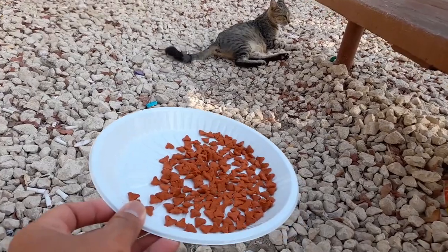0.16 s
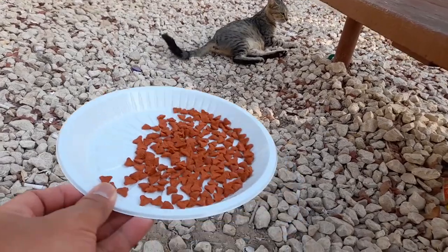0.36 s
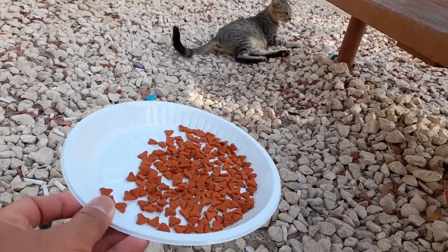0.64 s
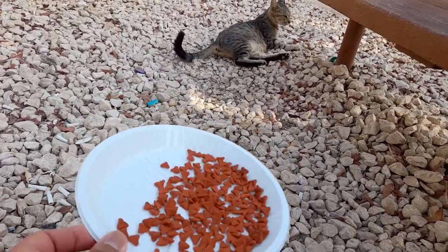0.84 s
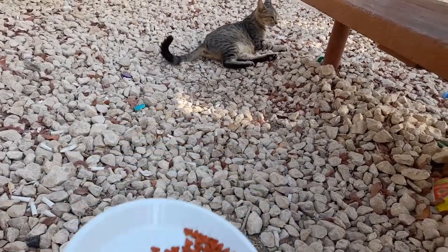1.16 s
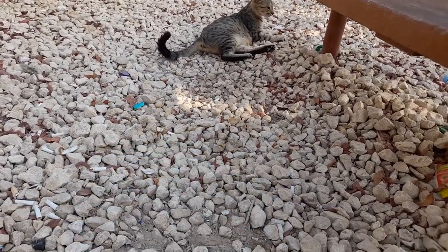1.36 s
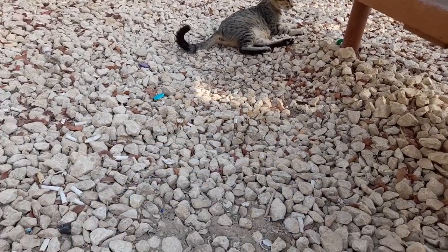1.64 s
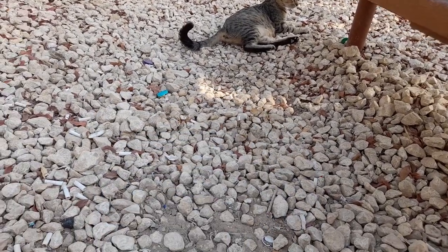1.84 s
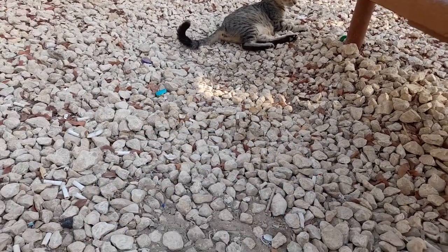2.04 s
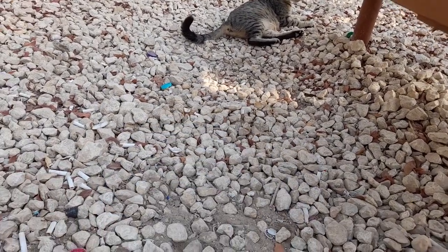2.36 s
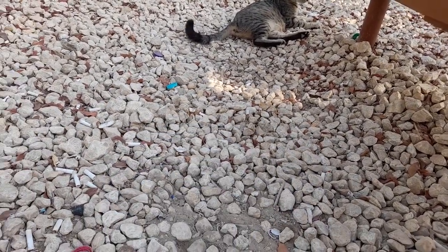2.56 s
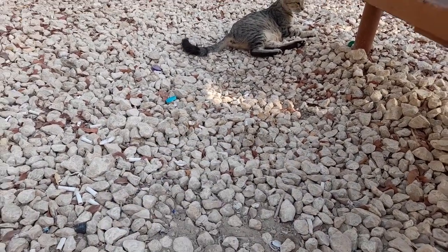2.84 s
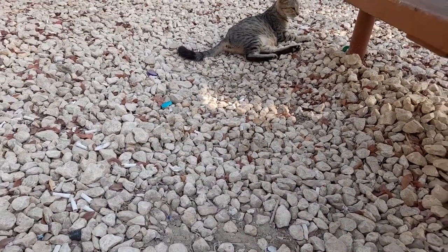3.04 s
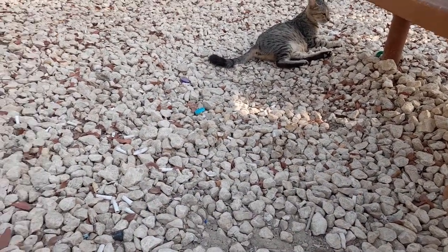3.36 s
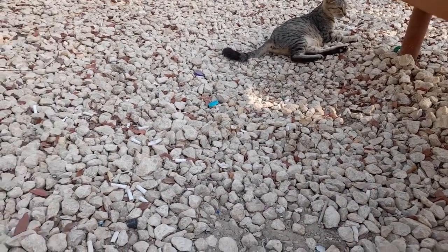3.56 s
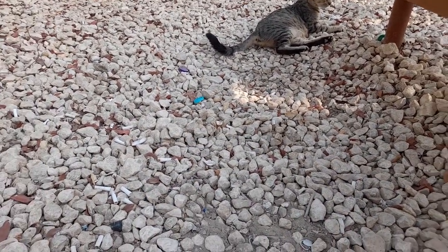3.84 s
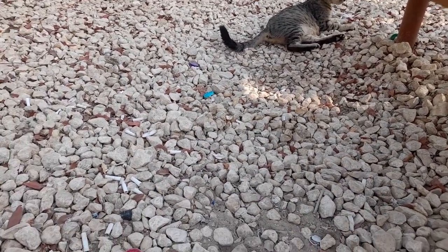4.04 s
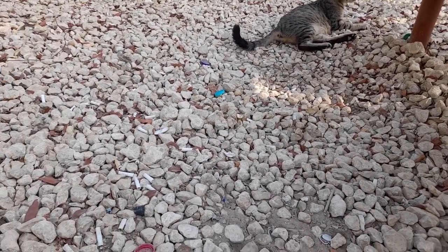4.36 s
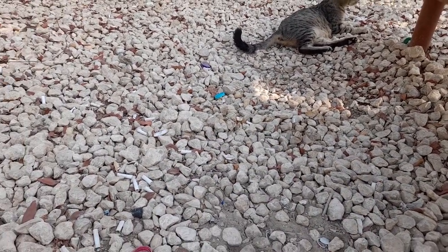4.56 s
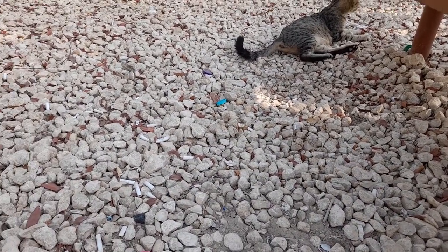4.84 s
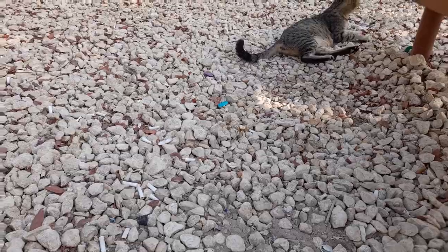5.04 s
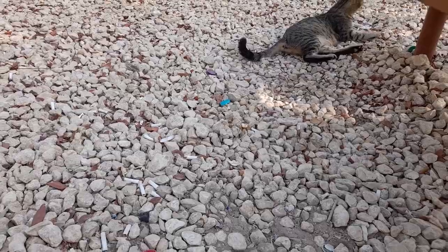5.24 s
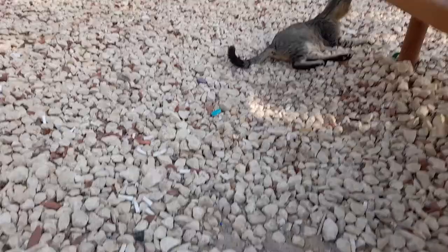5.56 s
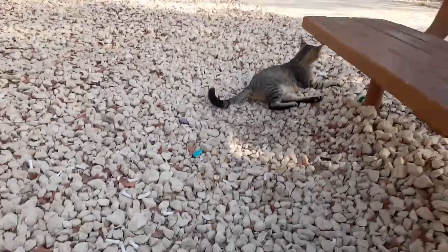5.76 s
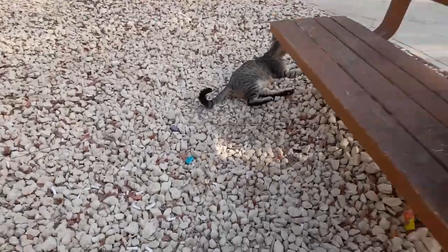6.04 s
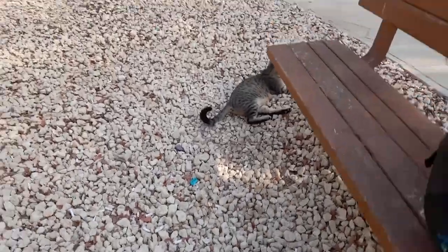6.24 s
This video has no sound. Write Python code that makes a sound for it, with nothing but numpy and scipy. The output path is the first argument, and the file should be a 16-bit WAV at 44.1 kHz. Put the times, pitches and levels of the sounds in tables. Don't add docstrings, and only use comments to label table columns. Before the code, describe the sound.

Three short, hard crunches of shoes shifting on coarse gravel, then quiet distant traffic rumble, and finally faint cloth rustles and sharp stone clicks.

```python
import sys
import numpy as np
from scipy import signal
from scipy.io import wavfile

SR = 44100
rng = np.random.default_rng(int(sys.argv[2]) if len(sys.argv) > 2 else 0)


def wav_out(sig):
    wavfile.write(sys.argv[1], SR, np.round(np.clip(np.atleast_2d(sig).T, -1, 1) * 32767).astype(np.int16))


def volts(x):
    e = np.asarray(x, float) / 20
    return 10 ** e


N = 282681


def rms_one(x):
    return x / np.sqrt(np.mean(x ** 2) + 1e-20)


def in_time(rows, silent_db=None):
    s, *columns = np.transpose(rows)
    return [np.interp(np.arange(N) / SR, s, c, silent_db, silent_db) for c in columns]


def at_hz(points, hz):
    points_hz, values = np.transpose(points)
    return np.interp(np.log(hz), np.log(points_hz), values)


def band(order, edges_hz, x, kind="band"):
    return signal.sosfilt(signal.butter(order, edges_hz, kind, fs=SR, output="sos"), x)


def drift(rate_hz):
    r = np.exp(-80 * np.pi * rate_hz / SR)
    slow = signal.lfilter([1], [1, -2 * r, r * r], rng.standard_normal(N // 40 + 2002))[2000:]
    return np.interp(np.arange(N) / 40, np.arange(len(slow)), rms_one(slow))


def ring(clicks, hz, t60_s):
    r = volts(-60 / (t60_s * SR))
    w = 2 * np.pi * min(hz, .45 * SR) / SR
    return signal.lfilter([np.sin(w)], [1, -2 * r * np.cos(w), r * r], clicks + 1e-18)


def noise(spectrum, low_hz, high_hz, alike, lead, patchy_db):
    edges = np.geomspace(low_hz, high_hz, round(3 * np.log2(high_hz / low_hz)) + 1)
    white, out = rng.standard_normal((2, 3, N + 4000)), 0
    for k, (low, high) in enumerate(zip(edges, edges[1:])):
        both, left, right = band(2, [low, high], white[k % 2])[:, -N:]
        hz = np.sqrt(low * high)
        share = np.clip(at_hz(alike, hz), 0, 1)
        pair = np.sqrt(share) * np.array([both, np.roll(both, lead)])
        pair += np.sqrt(1 - share) * np.array([left, right])
        out = out + volts(at_hz(spectrum, hz) + patchy_db * drift(min(hz / 30, 15))) * pair
    return rms_one(out)


def rubbed(rows, ring_s, lead):
    out = np.zeros((2, N + SR))
    for s, ms, hz, level_db in rows:
        span, at = round(ms * SR / 1000), round(s * SR)
        rub = rng.standard_normal(span) * np.hanning(span) ** .5
        note = ring(np.pad(rub, (0, SR // 20)), hz, ring_s)
        note *= volts(level_db) / np.sqrt(np.sum(note ** 2) / span)
        for side, delay in enumerate((0, lead)):
            out[side, at + delay:at + delay + len(note)] += note
    return out[:, :N]


# time_s, firing_hz, level_db, octave_db
ENGINES = [
    [(0.1, 87.1, -66, -62.5), (.35, 88.1, -80, -42.5), (.65, 90, -37, -42.5), (.9, 91.34, -40, -54),
     (1.25, 88.8, -44, -51), (1.6, 84.6, -77, -59)],
    [(1.62, 85.8, -61, -71), (1.75, 78.2, -42, -83), (1.95, 70.3, -51, -43.5), (2.15, 71.8, -43.5, -47),
     (2.35, 76.35, -40.5, -62), (2.55, 68, -40, -43), (2.75, 68, -70, -76)],
    [(4.4, 89.3, -64, -75), (4.7, 89.5, -43.5, -62), (4.95, 89.9, -36, -62), (5.15, 89.9, -62, -54),
     (5.35, 90.7, -34.5, -67), (5.6, 92, -61, -75)],
    [(6.2, 134.5, -77, -72), (6.35, 136, -33, -50), (6.41, 133, -38, -63)],
]


def engine(rows):
    hz, = in_time(rows)[:1]
    level_db, octave_db = in_time(rows, silent_db=-120)[1:]
    turn = 2 * np.pi * np.cumsum(hz) / SR
    return np.sqrt(2) * (volts(level_db) * np.sin(turn) + volts(octave_db) * np.sin(2 * turn))


# time_s, level_db
FLOW = [(0.0, -36), (0.21, -43.5), (0.77, -38.5), (1.48, -40.5), (2.03, -36), (2.27, -40.5), (2.46, -35),
        (2.95, -42), (3.3, -37.5), (3.59, -44), (3.62, -38.5), (4.71, -39), (4.91, -36), (5.71, -42),
        (5.91, -32.5), (6.09, -42.5), (6.39, -33.5), (6.41, -38)]
# pitch_hz, level_db_per_hz
ROAD = [(15, -49), (25, -60), (54, -11), (102, -9.5), (140, -1), (162, -12), (279, -6.5), (480, -29),
        (786, -29), (981, -38), (1140, -34.5), (2050, -36.5), (3120, -45), (3620, -42.5), (9000, -68.5),
        (11700, -95), (19800, -120)]
# pitch_hz, power_share
FAR_ALIKE = [(30, 1), (70, 0.88), (130, 0.96), (300, 0.75), (700, 0.199), (2000, 0.65), (8000, 0.072)]
# mean_db, swing_share
LAYERS = [
    (-40, 0.99),
    (-42.5, 0.9),
    (-48, 0.4),
    (-61.5, 0.25),
]
# time_s, lift_db, half_width_s
NEAR_CARS = [
    (.77, 6, .1),
    (5.95, 7, 0.25),
    (6.37, 6.5, 0.12),
]


def traffic():
    flow_db, = in_time(FLOW)
    swing_db = flow_db - flow_db.mean()
    deep_db, rumble_db, drone_db, tyre_db = [db + share * swing_db for db, share in LAYERS]
    for s, lift_db, half_s in NEAR_CARS:
        near_db = lift_db * np.exp(-((np.arange(N) / SR - s) / half_s) ** 2)
        tyre_db = tyre_db + near_db
        drone_db = drone_db + 0.12 * near_db
    out = volts(deep_db) * noise(ROAD, 36, 110, FAR_ALIKE, 3, patchy_db=1.5)
    out += volts(rumble_db) * noise(ROAD, 110, 200, FAR_ALIKE, 3, patchy_db=1.5)
    out += volts(drone_db) * noise(ROAD, 200, 450, FAR_ALIKE, 6, patchy_db=1.2)
    out += volts(tyre_db) * noise(ROAD, 450, 1050, FAR_ALIKE, 5, patchy_db=1.0)
    out += volts(-57) * noise(ROAD, 1080, 9300, FAR_ALIKE, 21, patchy_db=-1.8)
    return out + sum(engine(rows) for rows in ENGINES)


# start_s, length_ms, pitch_hz, level_db
TREAD = [(5.65, 120, 730, -60), (5.79, 92, 855, -63), (5.82, 120, 570, -67), (5.87, 60, 750, -59),
         (5.905, 52, 820, -56), (6.04, 47, 675, -58), (6.28, 100, 700, -64)]


def tyre_tread():
    return rubbed(TREAD, ring_s=0.084, lead=2)


# time_s, level_db
SETTLING = [
    [(2.655, -90), (2.68, -75), (2.85, -72), (3.0, -84), (3.1, -95)],
    [(5.66, -90), (5.72, -67), (6.0, -67), (6.14, -70), (6.2, -60), (6.26, -72), (6.41, -70)],
]


def settling():
    hiss = rms_one(band(2, [10000, 16000], rng.standard_normal(N)))
    level = sum(volts(in_time(rows, silent_db=-120)[0]) for rows in SETTLING)
    return hiss * volts(1.5 * drift(20)) * level


# start_s, hold_s, level_db, sheen_db
SWISHES = [(3.197, 0.25, -55, -8), (4.693, .006, -55.5, -13), (5.05, 0.011, -56.5, -25),
           (5.11, 0.047, -64, -27), (5.43, 0.056, -60, 1), (5.58, 0.16, -59, -17),
           (5.817, 0.028, -54.5, -16), (6.148, 0.054, -55, -12), (6.32, 0.037, -59, -29)]
# time_s, effort_db
LEANING = [(5.25, -90), (5.36, -63), (5.55, -52), (5.76, -58), (5.95, -58), (6.13, -60.5), (6.41, -56)]


def swishes():
    rise_db_per_s, fall_db_per_s = 600, 700
    linger_db, linger_db_per_s = -7, 24.5
    t, presence, sheen = np.arange(0, N, 16) / SR, 0, 0
    for s, hold, level_db, sheen_db in SWISHES:
        after = np.maximum(t - s - hold, 0)
        before_db = level_db - rise_db_per_s * np.maximum(s - t, 0)
        stroke = volts(before_db - fall_db_per_s * after)
        linger = volts(before_db + linger_db - linger_db_per_s * after)
        presence = presence + np.maximum(stroke, linger)
        sheen = sheen + stroke * volts(sheen_db)
    presence, sheen = np.repeat([presence, sheen], 16, axis=1)[:, :N]
    strain = volts(in_time(LEANING, silent_db=-120)[0])
    return presence + strain, sheen + strain * volts(-8)


# pitch_hz, level_db_per_hz
CLOTH = [(500, -10), (1000, -3), (2000, 3.5), (3400, -2.5), (5200, -3), (7000, -21), (8500, -18)]
# pitch_hz, level_db_per_hz
SHEEN = [(7500, -1), (10000, -1.5), (13000, 3.5), (16000, 1)]
# pitch_hz, power_share
NEAR_ALIKE = [(500, 0.9), (1500, 0.39), (4000, 0.074), (12000, 0.088)]


def clothes():
    presence, sheen = swishes()
    dull = noise(CLOTH, 450, 7500, NEAR_ALIKE, lead=13, patchy_db=1.4)
    bright = noise(SHEEN, 6700, 18000, NEAR_ALIKE, lead=5, patchy_db=1.0)
    return presence * volts(0.93 * drift(43)) * dull + sheen * bright


# start_s, length_ms, mode_hz, level_db
CREAKS = [(4.684, 24, 5170, -62), (4.686, 9.1, 7090, -67), (4.686, 8, 8700, -69), (5.439, 4, 12900, -58),
          (5.039, 20, 5070, -58.5), (5.044, 16.4, 3680, -63), (5.467, 4, 12700, -60),
          (5.042, 20, 6700, -76), (5.042, 24, 8750, -74), (5.12, 14, 2300, -62), (5.124, 20, 5250, -63),
          (5.126, 10, 4060, -61), (5.806, 12, 2600, -49), (5.807, 13, 3560, -53), (5.808, 11, 4700, -49),
          (5.804, 13, 6340, -55), (5.812, 9, 7900, -64), (5.812, 9, 8960, -68), (5.822, 13, 2470, -52),
          (5.823, 12, 4600, -57), (5.83, 12, 3600, -58)]


def plate():
    return rubbed(CREAKS, ring_s=0.028, lead=12)


def ground(x, echo_db):
    t = np.arange(round(.012 * SR)) / SR
    scatter = rng.standard_normal((2, len(t))) * (t > .0016) * volts(-60 * t / 0.0056)
    scatter = band(2, [1400, 7000], scatter)
    scatter *= volts(echo_db) / np.sqrt(np.sum(scatter ** 2, axis=1, keepdims=True))
    return x + signal.oaconvolve(x, scatter, axes=1)[:, :N]


# time_s, left_minus_right_db of the middle stones
FEET_PAN = [(.9, 0.5), (1.8, -1), (2.65, -5), (3.1, -7)]


def feet_pan_db():
    return in_time(FEET_PAN)[0]


# time_s, peak_db, ring_hz
CRACKLE = [(0.2627, -22, 2300), (.2735, -33, 2150), (.344, -29, 1200), (.357, -26, 1250),
           (.362, -27, 1940), (.381, -39, 5000), (.398, -39, 4900), (.417, -28, 1160),
           (.614, -35, 1200), (.374, -31, 1980), (0.382, -25, 1790), (0.4138, -24, 1990),
           (.5388, -36, 1420), (0.544, -30, 2170), (0.604, -33, 1720), (.6112, -25, 2200),
           (.6165, -35, 2020), (.6323, -32, 1490), (.755, -26, 2130), (.763, -26, 1490),
           (.77, -28, 1210), (0.7808, -18, 2150), (0.861, -12, 5300), (.956, -26, 5200),
           (.968, -20, 5000), (.993, -29, 1200), (.999, -23, 1900), (1.005, -27, 1700),
           (1.017, -34, 2000), (.799, -20, 1650), (0.806, -16, 2390), (0.821, -17, 1650),
           (.845, -11.5, 2450), (.869, -6, 2500), (0.8759, -10, 1660), (.8852, -15, 1560),
           (0.8905, -12.5, 1670), (.903, -7, 1700), (0.8968, -16, 1700), (0.912, -15, 1680),
           (.925, -18, 1700), (0.94, -15, 2560), (0.956, -20.5, 1720), (0.966, -20, 2550),
           (1.0336, -26, 1770), (1.05, -28, 1510),
           (1.634, -35, 2200), (1.6423, -32, 1600), (1.6735, -16.5, 1150), (1.6758, -23, 1520),
                  (1.6945, -25, 1270), (1.7087, -20, 1660), (1.713, -21, 1850), (1.739, -10, 1660),
                  (1.7466, -11, 1160), (1.7517, -13, 1200), (1.7683, -27, 1700), (1.7758, -14, 1270),
                  (1.79, -18, 1200), (1.802, -22, 1740), (1.875, -39, 1200), (1.888, -37, 1250),
                  (2.006, -29, 1200), (2.09, -16, 1200), (2.18, -38, 1200), (1.8134, -17, 1610),
                  (1.832, -18, 1700), (1.8435, -26, 1870), (1.855, -28, 1510), (1.95, -25.5, 1460),
                  (2.008, -22, 2200), (2.0205, -20.5, 1110), (2.038, -26, 2430), (2.0555, -16, 4480),
                  (2.0707, -17, 1700), (2.0856, -9, 2253), (2.0965, -9, 1838), (2.11, -24, 1700),
                  (2.1614, -20, 2270), (2.1658, -25, 2390), (2.2204, -31, 1581), (2.2515, -28, 1460),
           (2.294, -37, 2320), (2.3, -27, 1900), (2.306, -40, 5000), (2.402, -31, 1200),
                 (2.3064, -19.5, 1650), (2.3132, -26, 1610), (2.3245, -29, 1580), (2.3787, -25, 1690),
                 (2.4017, -30, 1683), (2.4766, -32, 1700), (2.554, -33, 1640), (2.5643, -36, 2130),
                 (2.578, -23, 1140), (2.607, -4, 1800), (2.6277, -5, 2650), (2.633, -10, 1660),
                 (2.638, -9, 2300), (2.66, -24, 1665), (2.706, -40, 2400), (2.7507, -32, 1312),
                 (2.7512, -41, 5200), (2.756, -30.5, 1960)]
# time_s, peak_db, ring_hz
THUMPS = [(0.93, -22, 480), (.861, -14, 520), (2.5, -33, 690), (1.7, -30, 690), (2.1, -34, 690),
          (6.14, -38, 640), (6.0315, -31, 990), (6.13, -43, 520), (6.2547, -31, 464), (6.2545, -35, 590)]


def crackle():
    for s, peak_db, hz in CRACKLE + THUMPS:
        ring_ms = 10.6 * (1700 / hz) ** 0.7
        yield s, peak_db + 6, hz, -29.5, 3, ring_ms


# time_s, peak_db, ring_hz, ring_ms, grit_db
KNOCKS = [(0.2614, -15, 1280, 10, -19), (0.3463, -17, 1400, 10, -31), (0.518, -27.5, 1500, 5.5, -14),
          (.666, -23.5, 2150, 8.8, -25), (0.871, -15, 1717, 5.6, -28), (0.884, 0, 1600, 12, -30),
          (0.908, -3, 1680, 9.6, -34), (1.671, -5.5, 1630, 8.5, -32), (1.745, -0.6, 1650, 5.1, -26),
          (1.777, -1.5, 2300, 3.3, -26), (1.793, -8.5, 1160, 10, -30), (1.882, -26, 4800, 2.8, -7),
          (2.0654, 2, 1250, 4.5, -19), (2.16, -14.5, 1280, 16, -25), (2.2522, -25, 1994, 6.7, -28),
          (2.379, -16, 3380, 4.4, -12), (2.47, -23.5, 1643, 54, -32), (2.493, -22, 1660, 37.5, -32),
          (2.5968, 5, 2920, 7.1, -39), (2.6075, -15, 1665, 6.5, -30), (2.64, 1.5, 1870, 9, -41)]
# time_s, peak_db, ring_hz, ring_ms, grit_db
SNAPS = [(5.5426, -29, 3830, 2.4, -9), (5.559, -26, 4440, 2.8, -30), (5.5665, -26, 4570, 2.5, -9),
         (5.576, -9, 4530, 0.73, -19), (5.5844, -29, 5080, 2.5, -6), (5.594, -20, 4800, 2.1, -12),
         (5.6213, -2, 4680, 2.2, -14.5), (5.6505, -4.5, 4760, 2.6, -16.5), (5.7322, -13, 4330, 1.4, -34),
         (5.808, -33, 5840, 3, -25), (5.8125, -32, 4700, 3, -28), (5.819, -32, 3000, 2.4, -24),
         (5.829, -38, 4400, 3.2, -25), (6.146, -30, 5600, 3, -17), (6.167, -29, 5100, 4.5, -12),
         (6.184, -36, 4000, 2.1, -4), (6.196, -30, 5000, 3, -3), (6.219, -28, 5000, 5.4, -16)]
# time_s, peak_db, ring_hz, ring_ms, grit_db
CLACKS = [(1.2078, -16, 2110, 4.4, -34), (1.2072, -40, 1300, 7, -33), (2.7515, -20.5, 1850, 8.6, -36),
          (3.0086, -30.5, 3340, 5, -35), (6.0314, -6, 2720, 2.5, -51), (6.0314, 0, 4800, 1.6, -45),
          (6.0314, -9, 3550, 2.9, -45), (6.1297, -22.5, 2040, 17, -40), (6.1302, -12.5, 880, 3.7, -48),
          (6.2545, -22, 5200, .6, -21)]
# left_lead_samples at 2 kHz, lead_samples_per_octave
CONTACTS = [
    (3, 0.01),
    (12, 0.01),
    (6, 2.9),
]


def contacts():
    for table, (lead, per_octave) in zip((KNOCKS, SNAPS, CLACKS), CONTACTS):
        for s, peak_db, hz, ring_ms, grit_db in table:
            yield s, peak_db, hz, grit_db, lead + per_octave * np.log2(hz / 2000), ring_ms


def knocks(table):
    out, span = np.zeros((2, N)), round(.04 * SR)
    pan_db = feet_pan_db()
    click = 1. * (np.arange(span) == 0)
    for s, peak_db, hz, grit_db, lead, ring_ms in table:
        near = rng.uniform([.55, 1.2], [.75, 1.5])
        body = ring(click, hz, ring_ms / 1000)
        body += volts(-42) * sum(ring(click, hz * k, ring_ms / 1400) for k in near)
        if hz < 2600:
            body += volts(-18) * ring(click, 5540, .003)
        body = band(4, [750, 6600], body) if hz > 700 else band(2, [380, 3000], body)
        grit = rng.standard_normal(span) * volts(-60 * np.arange(span) / (0.0017 * SR))
        grit = band(2, [8000, 14500], grit)
        for side, delay in enumerate((0, round(lead))):
            at = round(s * SR) + delay
            panned = volts((0.6 - side) * pan_db[at]) * body
            tick = volts(grit_db + 19.5 - 12 * side) * grit
            out[side, at:at + span] += volts(peak_db - 10) * (panned + tick)
    return out


# peak_s, level_db, rise_ms, fall_ms, grit_db above 7 kHz
FIRST_FOOT = [(0.262, -39.5, 11, 28, -15.5), (0.36, -35.5, 21.3, 51, -15.5), (0.417, -41.5, 49, 6.1, -14.5),
              (0.471, -51, 59, 16, -23), (0.518, -41.5, 2.1, 31, -16.5), (0.535, -46.5, 40, 25, -16.5),
              (0.614, -39.5, 30, 27, -19), (0.662, -53.5, 24, 53, -16), (0.764, -31.5, 5.4, 27, -18),
              (0.789, -26.5, 21, 120, -8.5), (0.879, -16.5, 35, 50, -9.5), (0.908, -26.5, 18, 5, -14.5),
              (0.966, -29.5, 89, 25, -14.5), (1.019, -34, 33, 24, -17), (1.06, -46, 41, 29, -46),
              (1.138, -44.5, 30, 1.67, -26)]
SECOND_FOOT = [(1.644, -37, 7.2, 16, -36), (1.673, -27, 20, 23, -23), (1.713, -33, 46, 6.9, -23),
               (1.731, -48, 9, 6, -3), (1.742, -17.5, 7.3, 16, -22), (1.777, -25, 34, 51, -19),
               (1.832, -33.5, 16, 15, -35), (1.881, -45.5, 89, 46, -14), (1.951, -38, 5.8, 78, -16.5),
               (2.008, -29.5, 1.5, 24, -25), (2.068, -17, 13.2, 9.9, -20), (2.099, -16.5, 21, 13, -18),
               (2.161, -31.5, 5.6, 14, -21), (2.165, -49, 84, 65, -21), (2.22, -37, 9.1, 5.5, -23),
               (2.252, -41, 1.4, 5.9, -18)]
THIRD_FOOT = [(2.305, -34.5, 33, 12, -20.5), (2.332, -41.5, 20, 5.1, -23), (2.371, -47, 30, 68, -11.5),
              (2.377, -40, 2.1, 23, -11), (2.401, -36.5, 22, 6.3, -32), (2.468, -44, 19, 23, -15.5),
              (2.494, -40.5, 19, 7.1, -37), (2.526, -42.5, 36, 120, -14), (2.597, -13.5, 3.3, 17.4, -16),
              (2.609, -26, 39, 2.7, -23), (2.626, -17.5, 6.5, 24.8, -23), (2.64, -15.5, 15.5, 6.9, -14),
              (2.657, -39, 12, 5, -18), (2.564, -43, 4, 30, -4), (2.75, -49, 2.4, 11.6, -29)]
SOLES = [
    -15,
    -17,
    -18,
]


def crunches():
    feet = zip((FIRST_FOOT, SECOND_FOOT, THIRD_FOOT), SOLES)
    rows = [tuple(row) + (sole,) for foot, sole in feet for row in foot]
    s, level_db, rise, fall, grit_db, thud_db = np.array(rows).T[:, :, None]
    doublings = np.log2((rise + fall) / 40)
    thud_db = thud_db + 4 * doublings - 0.2863 * (level_db + 35)
    return s, level_db, rise, fall, grit_db, thud_db


# pitch_hz, level_db_per_hz
STONES = [(400, -39), (490, -21), (750, -33), (1050, -12.5), (1400, -6), (1670, 3), (1950, -5),
          (2550, -4.5), (3200, -15.5), (4200, -9), (5250, 2), (6900, -13), (12500, -4.5), (16000, -17)]
DIRECTIONS = [
    (1.9, 0.56),
    (10, 0.82),
    (1.7, 3.5),
    (3.5, 2.5),
    (0.15, 0.56),
]
GRAINS = 15000


def gravel(spread_db, cycles, colour_db):
    when, span = np.sort(rng.uniform(0, 3, GRAINS)), round(3.1 * SR)
    s, level_db, rise, fall, grit_db, thud_db = crunches()
    ms = 1000 * (when - s)
    away = np.maximum(-ms / np.maximum(rise, 1), ms / np.maximum(fall, 1))
    press_db = level_db - 10 * away ** 1.5
    sizes_db = (1.44 * thud_db + 5, thud_db, 0, 0.73 * grit_db + 4, grit_db)
    pressure = [np.sqrt(np.sum(volts(press_db + db) ** 2, axis=0)) for db in sizes_db]
    force = rms_one(volts(spread_db * np.minimum(rng.exponential(1, GRAINS), 4)))
    busy = np.clip((pressure[2] / volts(-24)) ** 0.63, .16, .8)
    knocking = force * (rng.random(GRAINS) < busy) / np.sqrt(busy)
    grinding = rms_one(force ** 0.75)
    left, spot = (when * SR).astype(int), rng.standard_normal(GRAINS)
    pitches = np.geomspace(460, 15300, 48)
    pitches[17:19] = 1620, 1705
    power = volts(2 * at_hz(STONES, pitches)) * pitches
    size = np.digitize(pitches, [640, 975, 3800, 6800])
    lots = np.zeros((5, 2, span))
    for hz, share, z in zip(pitches, power, size):
        t60 = cycles / hz ** .5 / 40
        ringing = t60 * SR / np.log(1000) / 4 * GRAINS / (3 * SR)
        wander = volts(colour_db * drift(11.4)[left])
        mix = rng.standard_normal(GRAINS)
        strength = pressure[z] * wander * mix * (grinding if z == 4 else knocking)
        lead, scatter = DIRECTIONS[z]
        right = left + np.round(lead + scatter * spot).astype(int)
        clicks = np.array([np.bincount(at.clip(0), strength, span) for at in (left, right)])
        lots[z] += ring(clicks, hz, t60) * np.sqrt(share / power[size == z].sum() / ringing)
    lots[2:4] *= volts(np.outer([.7, -.3], feet_pan_db()[:span]))
    bright = band(3, 800, lots[2:].sum(axis=0), "high")
    return np.pad(lots[0] + lots[1] + bright, ((0, 0), (0, N - span)))


def scene():
    crunch = gravel(spread_db=0.5, cycles=13.1, colour_db=2.5) * volts(-3.5)
    crunch = ground(crunch, echo_db=-13)
    single = knocks(contacts()) + knocks(crackle())
    feet = crunch + ground(single, echo_db=-16)
    thin = band(4, 440, feet, "high")
    return traffic() + tyre_tread() + settling() + clothes() + plate() + thin


def top_cut(x):
    return signal.sosfilt(signal.butter(12, 16670, fs=SR, output="sos"), x)


# pitch_hz, width_hz, right_over_left_db
PORTS = [
    (617, 350, -3.5),
    (1650, 270, 1.5),
    (2300, 690, 10.5),
    (5000, 1480, 11.5),
    (9400, 5000, -3.5),
]


def record(dry):
    sides = []
    for x, part in zip(dry, (-.6, .4)):
        for hz, width_hz, lift_db in PORTS:
            g, w = volts(part * lift_db / 2), 2 * np.pi * hz / SR
            a, c = np.sin(w) * width_hz / hz / 2, -2 * np.cos(w)
            x = signal.lfilter([1 + a * g, c, 1 - a * g], [1 + a / g, c, 1 - a / g], x)
        sides.append(x * volts(part * 2.5))
    white = band(2, 4000, rng.standard_normal((2, N)), "high")
    hiss = volts(-75) * rms_one(white + volts(26) * ring(white, 13100, 0.00074))
    limited = .98 * np.tanh((np.array(sides) + hiss) / .98)
    low_pass = signal.cheby2(14, 40, 15990, fs=SR, output="sos")
    return top_cut(signal.sosfilt(low_pass, limited))


dry = scene()
out = record(dry)
wav_out(out)
```